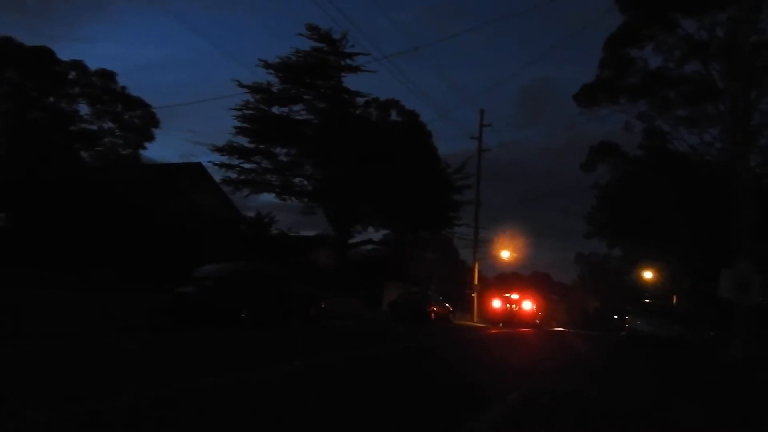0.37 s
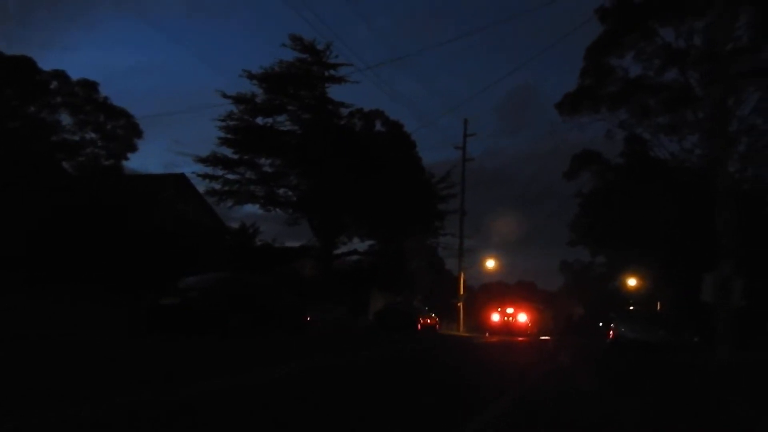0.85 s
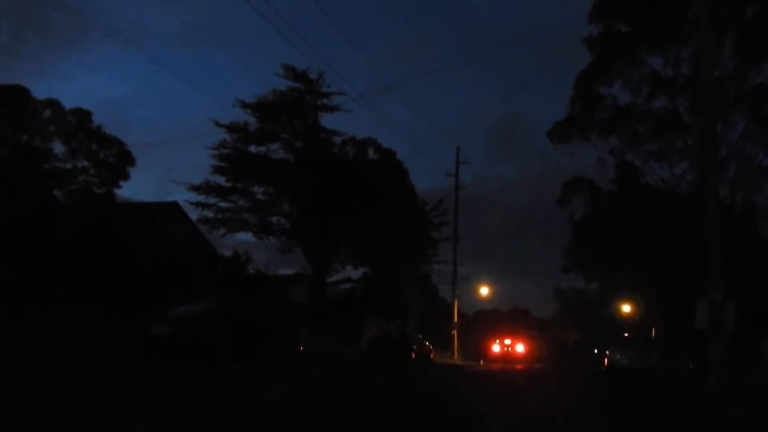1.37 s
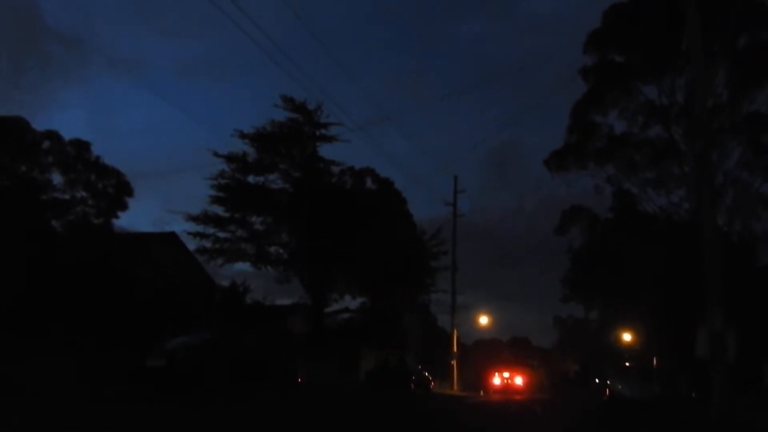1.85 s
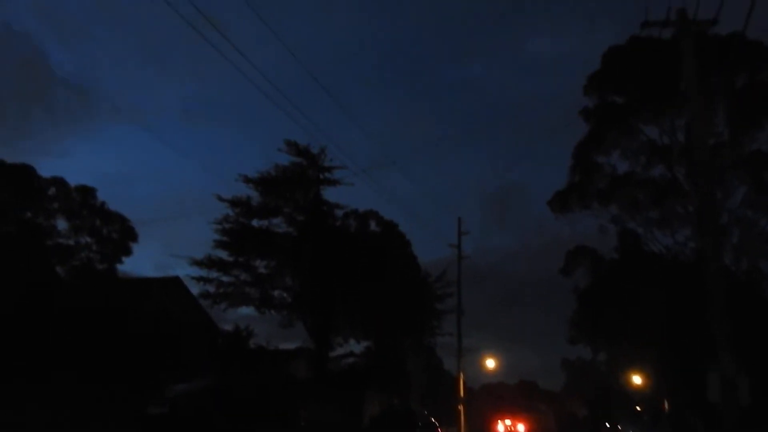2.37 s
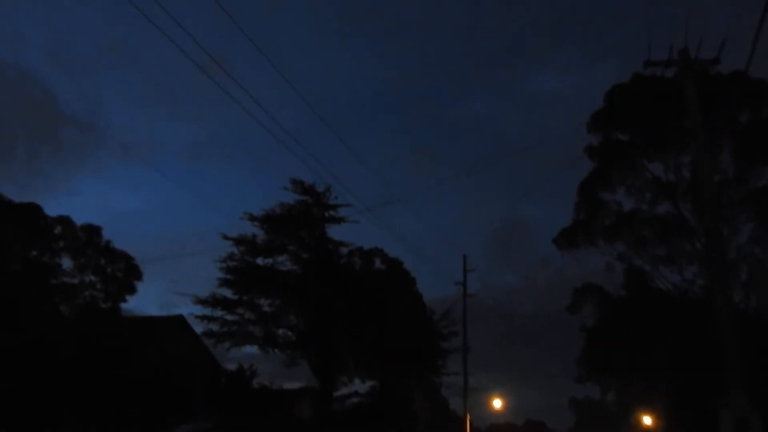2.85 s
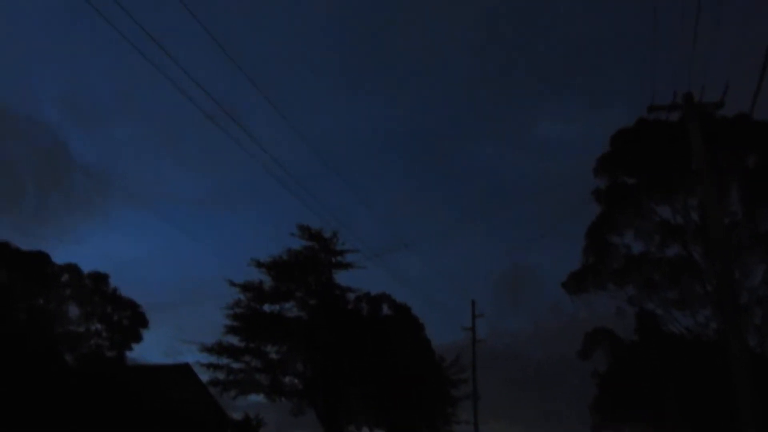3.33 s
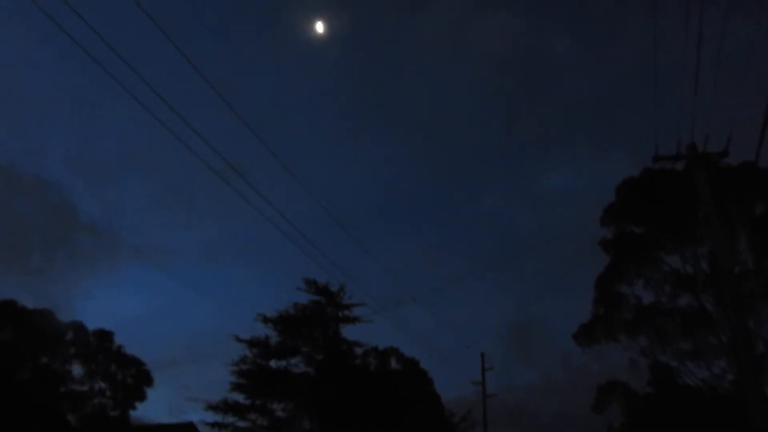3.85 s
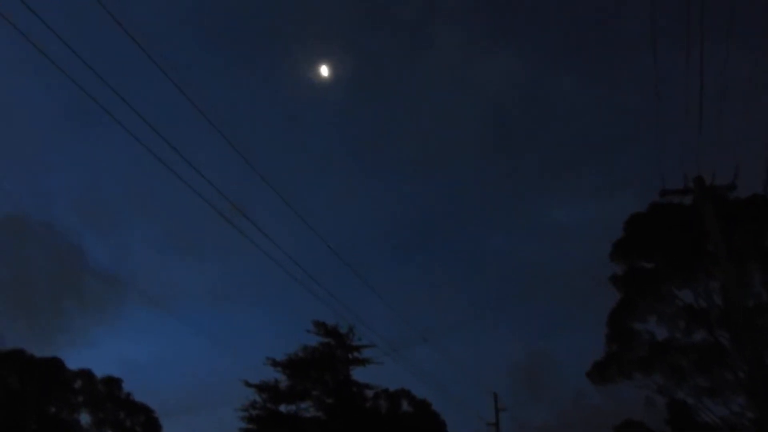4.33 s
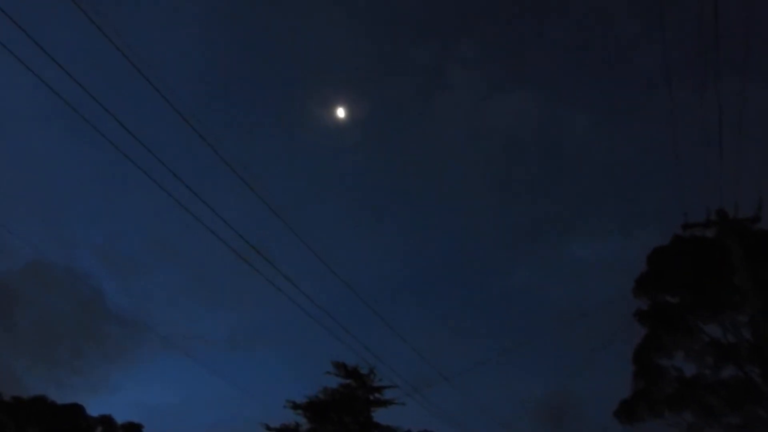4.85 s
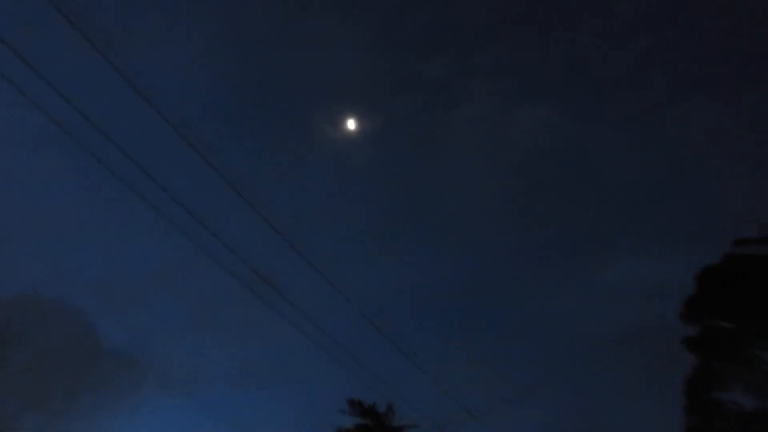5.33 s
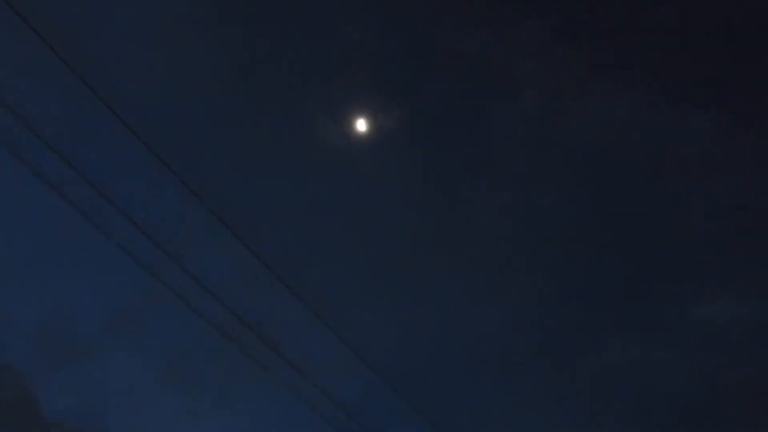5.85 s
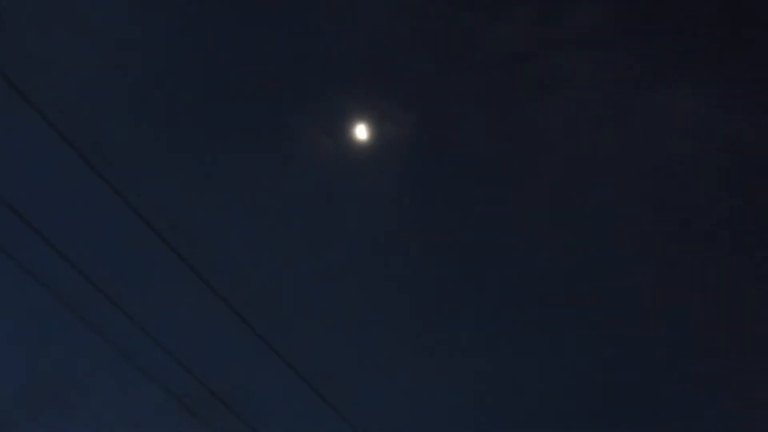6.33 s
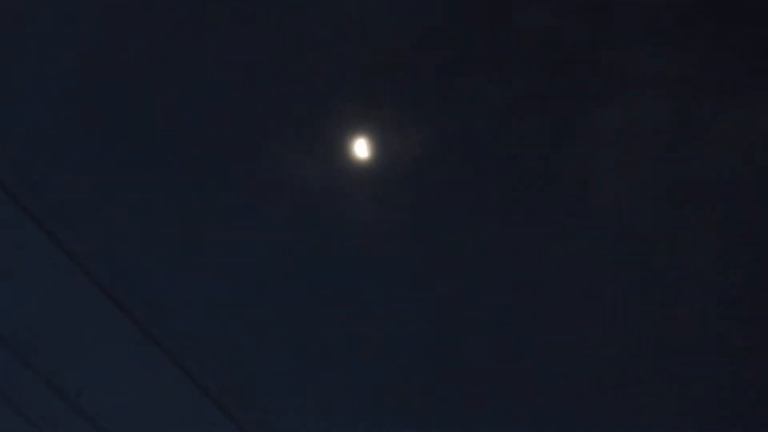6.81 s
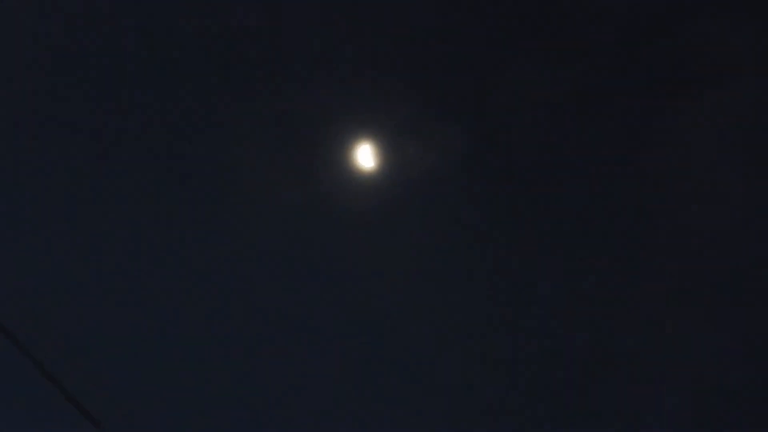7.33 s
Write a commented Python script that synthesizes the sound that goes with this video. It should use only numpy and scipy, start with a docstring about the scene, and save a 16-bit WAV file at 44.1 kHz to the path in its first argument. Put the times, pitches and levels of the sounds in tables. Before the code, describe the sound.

Shrill insect chorus dominates a dusky street as a departing car's low roar dwindles, then fingers tap the camera and its zoom motor whines.

```python
"""A street at dusk: insects chirr in the trees to the left of a hand-held camera's two microphones.
Near singers are pulsed noise and the far crowd steady noise; a car drives away as shaped noise and
firing pulses, over the rumble, hiss and wavering drone of far traffic. The camera tilts up to the sky,
so the echo off its holder shortens; fingers tick on its shell as decaying modes, then its lens motor
whines in wavering tones."""
import sys
import numpy as np
from scipy import signal
from scipy.fft import rfft, irfft, next_fast_len
from scipy.io import wavfile
from scipy.ndimage import uniform_filter1d, map_coordinates

SR = 44100
rng = np.random.default_rng(int(sys.argv[2]) if len(sys.argv) > 2 else 0)


def boost_factor(decibels):
    """Convert a level in decibels to a linear amplitude factor."""
    exponent = np.asarray(decibels, float) / 20
    return 10 ** exponent


def store_wav(level_fs):
    """Save 16-bit WAV to argv[1]."""
    pcm = np.round(np.clip(np.atleast_2d(level_fs), -1, 1) * 32767)
    wavfile.write(sys.argv[1], SR, pcm.T.astype(np.int16))


N = 328456

# Tilt of the camera: t/s, raised/0-1, chorus left over right as it turns/dB
CAMERA_TILT = [(0, 0, -0.2), (.7, 0.04, -.7), (1.5, 0.36, -0.4), (2.2, 0.61, 0), (2.7, 0.64, .2),
               (3.7, 0.87, .3), (4.2, 0.88, 0), (5, 0.96, 1), (5.8, 0.96, .8), (6.6, 0.92, -0.9),
               (7.45, 0.92, 0.5)]
# Street echoes off the holder: delay held level/ms, delay raised/ms, strength
STREET_ECHOES = [(1.53, 1.173, -0.22), (2.92, 2.113, 0.12)]
# Chorus echoes off the holder: delay held level/ms, delay raised/ms, strength
CHORUS_ECHOES = [(1.37, 1.182, -0.076), (2.7, 2.2, 0.07)]

# Likeness of street noise at the two microphones: f/Hz, correlation
LIKENESS = [(60, 1), (400, 0.99), (1400, 0.96), (2300, 0.8), (3500, 0.8)]
# Low rumble of far roads and of the car: f/Hz, relative level per Hz/dB
RUMBLE_SPECTRUM = [(12, -81.5), (20, -32), (65, -2), (87, 1), (177, -1), (206, -7), (284, -5.5), (392, -24),
                   (500, -15), (650, -56), (1100, -120)]
# Swells of the road rumble: t/s, level/dB
ROAD_SWELLS = [(1.6, -41), (3.6, -37), (4.8, -39), (6.8, -36.5), (7.45, -38.5)]
# Hiss of distant roads: f/Hz, relative level per Hz/dB
ROAD_HISS = [(210, -39), (350, -17.5), (738, 2), (815, -5.5), (862, -2), (1390, -4), (1630, -7.5),
             (2080, -3.5), (3700, -33.5), (5000, 1), (6500, -21), (11000, -120)]
# A far engine: t/s, f/Hz, level/dB
FAR_ENGINE = [(4.9, 455, -79), (5.35, 450, -49.5), (5.8, 400, -61), (6.25, 345, -59), (6.8, 350, -61),
              (7.45, 346, -57)]
ROAD_HISS_DB = -45.5
BUSIER_S, BUSIER_TAKES_S, BUSIER_DB = 5.8, 1.5, 3  # the road hiss grows late on

# Exhaust and body resonances of the car: f/Hz, width/Hz, relative level/dB
EXHAUST_MODES = [(84, 30, -8.5), (150, 91, -4), (227, 69, -0.5), (269.5, 27, -1.5), (434.4, 103, -5.5),
                 (635, 148, -4)]
# Tread and cavity resonances of its tyres: f/Hz, width/Hz, relative level/dB
TYRE_MODES = [(815, 32, -2.5), (992, 90, 1), (1165, 170, -2), (1434, 96, -1), (1712, 32, -7.5)]
# Tyre hiss, brighter than the tread roar: f/Hz, relative level per Hz/dB
TYRE_HISS = [(1100, -39), (1600, -1), (2000, -1), (2600, -10), (3500, -15), (4500, -16), (6000, -59),
             (8000, -120)]
ENGINE_DB, TYRES_DB, TYRE_HISS_DB, BOOM_DB = -29.5, -30, -43, -36.5  # the car at its first distance
DISTANCE_M, SPEED_M_S = 15.6, 8.14  # first distance, speed away
HISS_CARRIES = 0.15  # share of the distance loss in the tyre hiss
LIFT_S, LIFT_TAKES_S, LIFT_ENGINE_DB, LIFT_TYRES_DB = 1.34, 0.13, -6.5, -3.5  # the driver eases off
# the car passes out of direct earshot, then fades
HIDDEN_S, HIDDEN_TAKES_S, HIDDEN_DB, FADE_DB_PER_S = 2.54, 0.45, -4, -6

# Lens motor speed: t/s, whine f/Hz
LENS_SPEED = [(5.75, 1190), (6.4, 1210), (6.9, 1198), (7.07, 1230), (7.27, 1180), (7.36, 1215),
              (7.45, 1205)]
# Motor and its two gear stages: pitch ratio, relative level/dB
WHINE_TONES = [(1, 0), (.79, -9), (.62, -11)]
# Gear hiss: f/Hz, relative level per Hz/dB
GEAR_HISS = [(2400, -26), (2600, 8), (2900, -3), (3100, -19)]
LENS_S, WAVER_HZ = 5.75, 7  # middle of the motor's fade-in; its slow waver
WHINE_DB, WHINE_DB_PER_S = -57, 5.5  # it grows under load
GEARS_S, GEARS_TAKE_S, GEARS_DB = 6.55, .5, -53  # the gear hiss sets in

# Fingers on the shell: t/s, level/dB, top mode where the finger lands/dB
FINGER_TICKS = [(5.2694, -34, -6), (5.3537, -34, 2), (5.3782, -35, 2), (5.5108, -36, 0)]
# Ringing of the shell, top mode last: f/Hz, relative level/dB, t60/s
SHELL_MODES = [(1700, 0, 0.018), (2050, 0, 0.014), (2750, 2, 0.022)]
# Ringing of the knocked panel: f/Hz, relative level/dB, t60/s
PANEL_MODES = [(1070, 7.5, 0.03), (600, -3, 0.035), (1450, 0, 0.035)]
# Thump of the camera body: f/Hz, relative level/dB, t60/s
BODY_MODES = [(113, -2, .16), (190, -1, .14), (285, 1, .11)]
PRESS_S, KNOCK_DB, THUMP_DB = 5.5122, -33, -28  # the last touch is a firm press

# Near singers: pulses/s, swells/s, mean level/dB, left microphone's lead/us
NEAR_SINGERS = [(143.6, 21, -3, 42), (146.5, 19.5, -4, 45), (144.2, 58, -8.5, 54), (145.4, 31, -5.5, 49)]
# Colour of the far crowd against the near singers: f/Hz, level/dB
CROWD_COLOUR = [(5500, 2), (7500, -1.5), (9500, 1)]
# The singers' membranes, camera held level: f/Hz, relative level per Hz/dB
SONG_LEVEL = [(2470, -69), (4200, -44), (4780, -37), (5330, -20), (5740, -16.5), (6210, -7.5), (6620, -1.5),
              (7950, -8), (8480, -19.5), (8910, -27.5), (9140, -33), (11900, -38), (20100, -120)]
# The same, camera raised to the sky: f/Hz, relative level per Hz/dB
SONG_RAISED = [(2470, -45.5), (4200, -45.5), (4600, -39), (6470, -0.5), (8130, -8), (9140, -32.5),
               (11900, -42.5), (20100, -120)]
CHORUS_DB, CHORUS_RAISED_DB, TILT_POWER = -12, -3.5, 2.9  # held level; change when raised; tilt curve
CROWD_DB, CROWD_DB_PER_S = -5.6, .55  # far crowd over the near singers, slowly gaining


def unit(x):
    """Scaled to rms 1."""
    return x / np.sqrt(np.mean(x ** 2) + 1e-20)


def along(points, hz):
    """(f/Hz, value) points read on a log frequency axis."""
    f, v = np.transpose(points)
    return np.interp(np.log(hz + 1), np.log(f + 1), v)


def curves(rows):
    """One value per sample for each column after the time."""
    s, *cols = np.transpose(rows)
    return [np.interp(np.arange(N) / SR, s, c) for c in cols]


def step(at_s, takes_s):
    """A smooth change from 0 to 1 centred on at_s."""
    return .5 + .5 * np.tanh(2 * (np.arange(N) / SR - at_s) / takes_s)


def wobble(rate):
    """A smooth random curve, rate knots a second."""
    knots = rng.standard_normal(int(N * rate / SR) + 4)
    return map_coordinates(knots, [np.arange(N) * rate / SR])


def filtered(x, response):
    """x times a complex response of frequency."""
    m = next_fast_len(N + 8192)
    return irfft(rfft(x, m) * response(np.fft.rfftfreq(m, 1 / SR)), m)[..., :N]


def ringing(modes, steep):
    """The (f/Hz, level/dB) outline of resonances; steep deepens the valleys between them."""
    hz = np.geomspace(20, SR / 2, num=500)
    power = sum(boost_factor(2 * db) / (1 + ((hz * hz - centre * centre) / (hz * width)) ** 2) ** steep
                for centre, width, db in modes)
    return np.transpose([hz, 10 * np.log10(power)])


def patchy(x, patchy_db, bins, frames):
    """Random gain patches over time and frequency, the same at both microphones."""
    z = signal.stft(x, nperseg=512)[2]
    field = uniform_filter1d(rng.standard_normal(z.shape[1:]), bins, -2)
    field = uniform_filter1d(field, frames, -1)
    return signal.istft(z * boost_factor(patchy_db * unit(field)), nperseg=512)[1][..., :N]


def rush(spectrum, shape=1):
    """Street noise of rms 1, nearly alike at both microphones; shape is a fast envelope."""
    def colour(hz):
        # this split into mid and side sets the left-right correlation
        turn = np.arccos(np.clip(along(LIKENESS, hz), -1, 1)) / 2
        return boost_factor(along(spectrum, hz)) * [np.cos(turn), np.sin(turn)]

    mid, side = filtered(shape * rng.standard_normal((2, N)), colour)
    return unit(np.array([mid + side, mid - side]))


def camera():
    """How far the camera is raised, and how its turning balances the chorus in dB."""
    raised, pan_db = curves(CAMERA_TILT)
    return np.clip(raised, 0, 1), pan_db


def echoed(pair, echoes):
    """The sound plus reflections off the holder, whose delays shorten as the camera rises."""
    raised = camera()[0]
    out = pair
    for level_ms, raised_ms, strength in echoes:
        delay_ms = level_ms + (raised_ms - level_ms) * raised
        at = np.arange(N) - delay_ms * SR / 1000
        out = out + strength * np.array([map_coordinates(x, [at], order=5, mode="mirror") for x in pair])
    return out


def traffic():
    """Distant roads: a rumble, a hiss that grows late on and one far engine whose rough note comes and goes."""
    hz, drone_db = curves(FAR_ENGINE)
    drone = boost_factor(drone_db) * unit(wobble(110) * np.sin(2 * np.pi * np.cumsum(hz) / SR))
    hiss_db = ROAD_HISS_DB + BUSIER_DB * step(BUSIER_S, BUSIER_TAKES_S)
    rumble = boost_factor(curves(ROAD_SWELLS)[0]) * rush(RUMBLE_SPECTRUM)
    return rumble + boost_factor(hiss_db) * rush(ROAD_HISS) + drone


def car():
    """Firing pulses and noise in the pipe, tread roar in its resonances and a brighter, longer-lasting hiss."""
    t = np.arange(N) / SR
    away_db = -20 * np.log10(1 + SPEED_M_S * t / DISTANCE_M)
    hidden_db = HIDDEN_DB * step(HIDDEN_S, HIDDEN_TAKES_S) + FADE_DB_PER_S * np.maximum(t - HIDDEN_S, 0)
    lift = step(LIFT_S, LIFT_TAKES_S)
    engine_db = away_db + LIFT_ENGINE_DB * lift

    pipe = ringing(EXHAUST_MODES, steep=2.25)
    count = np.floor(np.cumsum(35 + .5 * wobble(3)) / SR)  # about 35 firings a second
    firings = np.diff(count, prepend=0) * boost_factor(2 * rng.standard_normal(N))
    # the pipe smears each pulse
    beats = unit(filtered(firings, lambda hz: boost_factor(along(pipe, hz)) * np.exp(-1j * (hz / 55) ** 1.5)))
    exhaust = rush(pipe, shape=boost_factor(1.8 * wobble(44.8)))
    engine = boost_factor(ENGINE_DB + engine_db) * (exhaust + 0.36 * beats)

    treads = rush(ringing(TYRE_MODES, steep=1.29), shape=boost_factor(1.13 * wobble(30.1)))
    tyres = boost_factor(TYRES_DB + away_db + LIFT_TYRES_DB * lift) * treads
    boom = boost_factor(BOOM_DB + engine_db) * rush(RUMBLE_SPECTRUM)
    hiss = boost_factor(TYRE_HISS_DB + HISS_CARRIES * away_db) * rush(TYRE_HISS)
    # a little to the right
    return boost_factor(hidden_db) * (engine + tyres + hiss + boom) * boost_factor([[-.6], [.6]])


def lens():
    """The zoom motor: a wavering whine with fainter gear tones and a band of gear hiss."""
    hz = curves(LENS_SPEED)[0] + WAVER_HZ * wobble(5)
    growth_db = WHINE_DB_PER_S * (np.arange(N) / SR - LENS_S)
    level = step(LENS_S, .6) * boost_factor(WHINE_DB + growth_db)
    whine = 0
    for ratio, db in WHINE_TONES:
        loudness = boost_factor(db + 2.3 * wobble(12))
        phase = 2 * np.pi * ratio * np.cumsum(hz + 9 * wobble(40)) / SR
        whine = whine + loudness * np.sin(phase)
    hiss = rush([(2000, -120)] + GEAR_HISS + [(3600, -120)])
    gears = boost_factor(GEARS_DB) * step(GEARS_S, GEARS_TAKE_S) * hiss
    return np.sqrt(2) * level * whine + gears


def fingers():
    """A contact cracks and rings the shell's modes; a firm press also knocks a panel and thumps the body."""
    out, t = np.zeros(N + SR), np.arange(SR // 4) / SR
    onset = 1 - np.exp(-t / 0.00047)
    band = signal.butter(4, [1450, 3050], "band", fs=SR, output="sos")

    def ring(modes):
        return sum(boost_factor(db + rng.normal(0, 1.3) - 60 * t / t60) * np.sin(2 * np.pi * hz * t)
                   for hz, db, t60 in modes)

    for s, db, top_db in FINGER_TICKS:
        tick = ring(SHELL_MODES[:-1]) + boost_factor(top_db) * ring(SHELL_MODES[-1:])
        crack = unit(signal.sosfilt(band, rng.standard_normal(len(t))))
        crack = .9 * boost_factor(-60 * t / 0.014) * crack  # t60 of 14 ms
        out[round(s * SR):][:len(t)] += boost_factor(db) * onset * (tick + crack)
    press = boost_factor(KNOCK_DB) * ring(PANEL_MODES) + boost_factor(THUMP_DB) * ring(BODY_MODES)
    out[round(PRESS_S * SR):][:len(t)] += onset * press
    return out[:N]


def singer(pulse_rate, swell_rate, lead_us):
    """Membrane pulses as noise bursts, strong and weak in turn, swelling in phrases; left hears them first."""
    t = np.arange(N) / SR
    cycle = 2 * np.pi * (pulse_rate * t + rng.random() + .1 * wobble(3))
    swell = np.cos(2 * np.pi * (swell_rate * t + rng.random() + 0.23 * wobble(2)))
    bursts = 1 + (.21 + .22 * swell) * np.cos(cycle) + .15 * np.cos(cycle / 2) + .1 * swell

    def lead(hz):
        # half the lead early at the left, half late at the right
        return np.exp(1j * np.pi * hz * lead_us / 10 ** 6 * np.array([[1], [-1]]))

    return filtered(unit(bursts * rng.standard_normal(N)), lead)


def chorus():
    """Near singers over a far crowd blurred into hiss from all sides; colour and level turn with the camera."""
    raised, pan_db = camera()
    near = unit(sum(boost_factor(db + wobble(1.2)) * singer(pulses, swells, lead_us)
                    for pulses, swells, db, lead_us in NEAR_SINGERS))
    far = filtered(rng.standard_normal((2, N)), lambda hz: boost_factor(along(CROWD_COLOUR, hz)))
    both = near + boost_factor(CROWD_DB + CROWD_DB_PER_S * np.arange(N) / SR) * far
    # leaves and walls colour the song a little, slowly
    both = patchy(both, patchy_db=1.48, bins=2, frames=200)
    both = echoed(both, CHORUS_ECHOES)
    # even out the slow level, so that the camera alone moves it
    slow_power = uniform_filter1d(np.mean(both ** 2, axis=0), size=SR)
    both = both / np.sqrt(np.abs(slow_power))
    level = unit(filtered(both, lambda hz: boost_factor(along(SONG_LEVEL, hz))))
    up = unit(filtered(both, lambda hz: boost_factor(along(SONG_RAISED, hz))))
    away = raised ** TILT_POWER
    gain = boost_factor(CHORUS_DB + CHORUS_RAISED_DB * away + np.outer([.5, -.5], pan_db))
    return gain * ((1 - away) * level + away * up)


def scene():
    """The street reaches the microphones directly and off the holder."""
    return chorus() + echoed(car() + traffic(), STREET_ECHOES) + fingers() + lens()


def roll_off(x):
    """The treble ends steeply here."""
    return signal.sosfilt(signal.butter(12, 15800, fs=SR, output="sos"), x)


def record(dry):
    """The microphone input stage clips the loudest peaks."""
    ceiling, hardness = .84, 30
    clipped = dry / (1 + np.abs(dry / ceiling) ** hardness) ** (1 / hardness)
    return roll_off(clipped)


dry = scene()
out = record(dry)
store_wav(out)
```